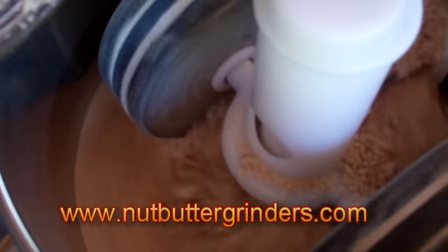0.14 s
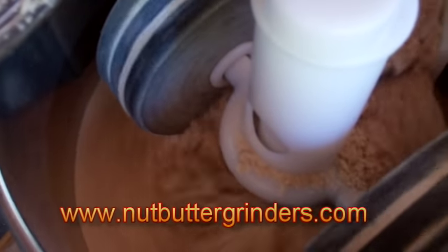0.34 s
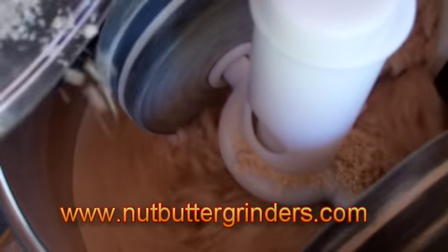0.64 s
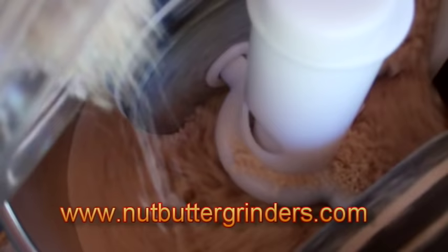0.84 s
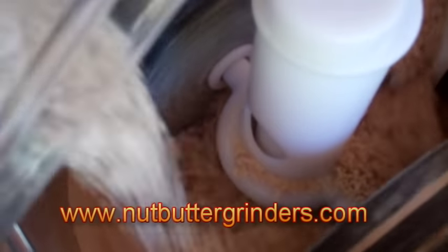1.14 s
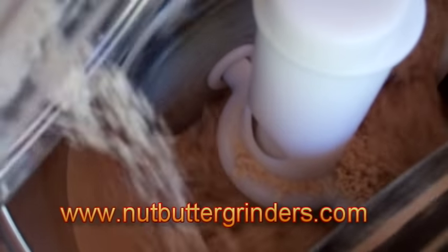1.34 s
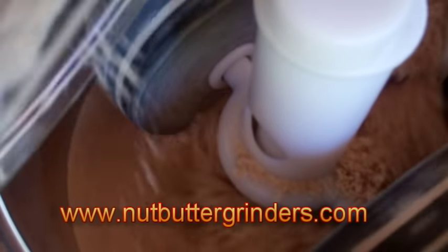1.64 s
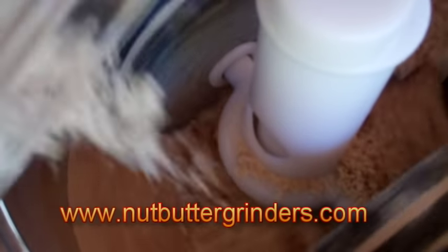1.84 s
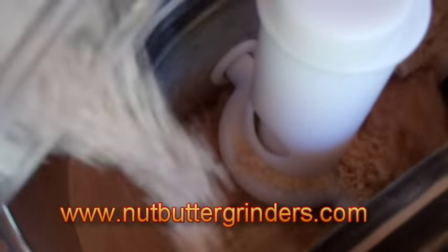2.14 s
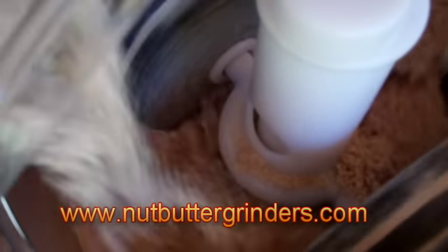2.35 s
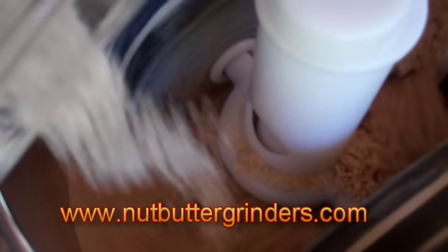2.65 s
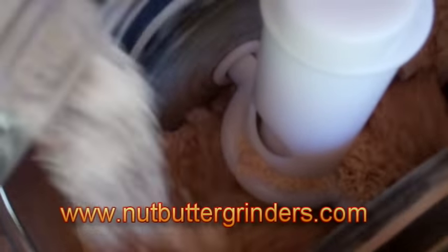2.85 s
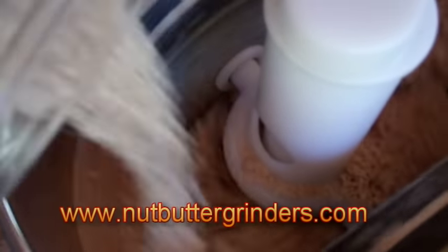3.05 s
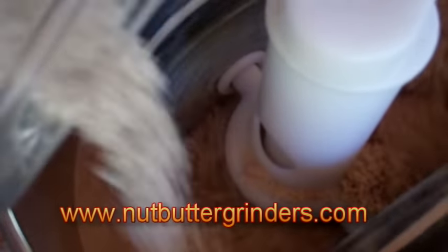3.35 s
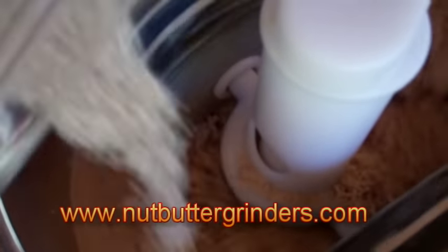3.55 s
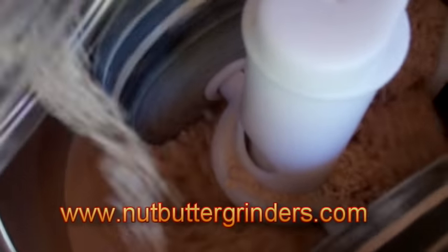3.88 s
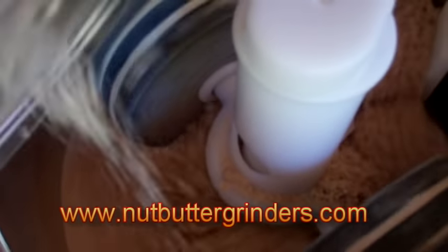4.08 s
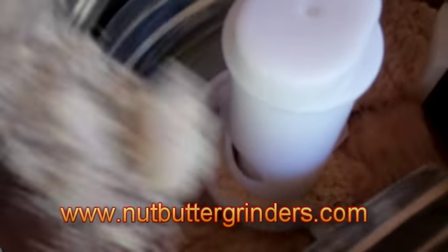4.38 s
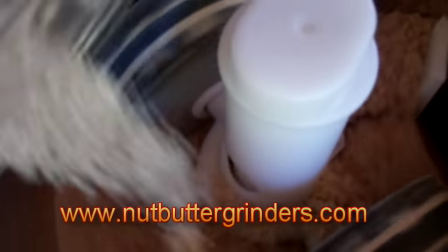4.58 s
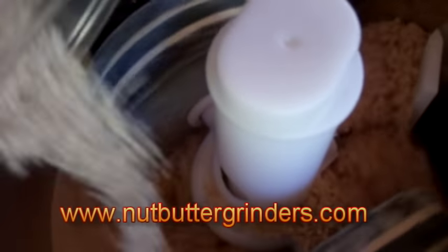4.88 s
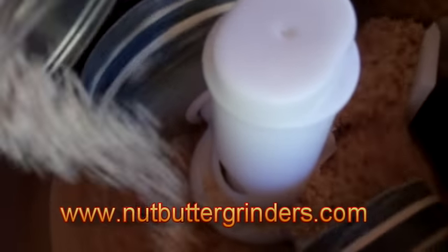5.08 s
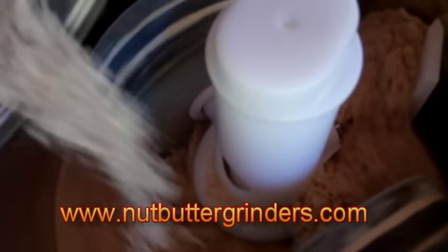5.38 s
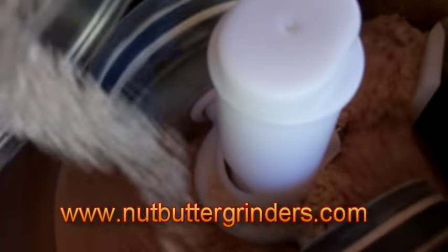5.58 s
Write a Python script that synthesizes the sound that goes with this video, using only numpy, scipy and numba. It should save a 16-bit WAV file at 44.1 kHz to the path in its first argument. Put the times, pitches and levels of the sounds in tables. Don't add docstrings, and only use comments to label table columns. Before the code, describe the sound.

A small electric stone grinder hums and rumbles steadily up close, seeds crackling and pinging, with a soft knock every half second.

```python
import sys
import numpy as np
from scipy import signal
from scipy.io import wavfile
from scipy.ndimage import uniform_filter1d
from numba import njit

SR = 44100
rng = np.random.default_rng(int(sys.argv[2]) if len(sys.argv) > 2 else 0)


def wav_out(sig):
    wavfile.write(sys.argv[1], SR, np.round(np.clip(np.atleast_2d(sig).T, -1, 1) * 32767).astype(np.int16))


def makeup_ratio(level_db):
    decades = np.asarray(level_db, float) / 20
    return 10 ** decades


N = 252235
T = np.arange(N) / SR
NOMINAL_HZ = 114
# [t/s, level/dB, wall ring above that/dB]
KNOCKS = [(.1108, -32, -4), (.562, -24.5, -16), (1.0137, -27, -10), (1.465, -32, -1), (1.916, -28, -11),
          (2.368, -30.5, -7), (2.821, -29, -11), (3.2795, -32, -5), (3.7408, -38, 0), (4.2051, -31, -10),
          (4.6655, -40, 2), (5.1347, -37.5, -2), (5.6028, -37, -4)]


@njit
def svf(x, hz, width_hz):
    y, band, low = np.empty(len(x)), 0., 0.
    g, k = np.tan(np.pi * hz / SR), width_hz / hz
    scale = 1 / (1 + g * (g + k))
    for i in range(len(x)):
        v = (band + g * (x[i] - low)) * scale
        band, low, y[i] = 2 * v - band, low + 2 * g * v, k * v
    return y


@njit
def follower(x, attack, release):
    y, level = np.empty(len(x)), 0.
    for i in range(len(x)):
        level += (x[i] - level) * (attack if x[i] > level else release)
        y[i] = level
    return y


def unit(x):
    return x / np.sqrt(np.mean(x ** 2))


def walk(rate_hz):
    knots = rng.standard_normal(N // 256)
    path = np.interp(T * rate_hz, np.arange(len(knots)), knots)
    return unit(uniform_filter1d(path, int(SR / rate_hz / 2)))


def columns(table):
    s, *rest = np.transpose(table)
    return [uniform_filter1d(np.interp(T, s, c), 2048) for c in rest]


def log_interp(hz, curve):
    f, value = np.transpose(curve)
    return np.interp(np.log(hz), np.log(f), value)


def bump(x, centre, width):
    return np.exp(-.5 * ((x - centre) / width) ** 2)


def pair(hz, width_hz, push=1):
    # [f/Hz, correlation]
    likeness = [(30, 0.7), (60, 0.98), (300, 1), (640, 0.97), (1400, 0.85), (3000, 0.57), (7000, 0.29),
                (14000, 0.13)]
    alike = np.clip(log_interp(hz, likeness), 0, .999)
    f, w = 1. * hz, 1.36 * width_hz
    noise = push * (rng.random((2, N)) - .5)
    mid, side = [unit(svf(svf(x, f, w), f, w)) for x in noise]
    mid = mid * np.sqrt((1 + alike) / 2)
    side = side * np.sqrt((1 - alike) / 2)
    return np.array([mid + side, mid - side])


def partial(phase, db, jitter, flutter_db, rate_hz, pan_db):
    level = np.sqrt(2) * makeup_ratio(db + flutter_db * walk(rate_hz))
    tone = level * np.sin(phase + jitter * walk(rate_hz))
    return tone * makeup_ratio(np.array([[pan_db], [-pan_db]]) / 2)


def controls():
    # [t/s, mean tooth rate/Hz, muffling by the paste/dB]
    speed = [(0, 114.3, 0.5), (1.5, 113.9, -1), (2.7, 113.7, -2), (3.3, 111.9, -3), (4.4, 112, -6.5),
             (5, 111.2, -9), (5.72, 111.5, -9)]
    # [t/s, tooth rate gained/Hz]
    lurches = [(.27, 1.8), (.76, 2), (1.26, 2.8), (1.69, 2.4), (2.2, 2.6), (2.62, 2.4), (3.09, 1.8),
               (3.56, 1.47), (4.12, 1.3), (4.7, 1.17), (5.26, 2), (5.64, 1.06)]
    # [level/dB, slope on mean rate/(dB/Hz), slope on lurch/(dB/Hz), share of muffling]
    voices = [
        (-36.5, -0.37, 1.17, 0),
        (-22, -0.42, -1, 0.0062),
        (-35.5, 0, 1.24, 0.8),
        (-43.5, 0, 1.65, 1.08),
    ]
    mean_hz, muffle_db = columns(speed)
    lurch_hz = sum(gain * bump(T, s, .075) for s, gain in lurches)
    sag_hz = mean_hz - NOMINAL_HZ
    levels = [db + a * sag_hz + b * lurch_hz + c * muffle_db for db, a, b, c in voices]
    return mean_hz + lurch_hz, muffle_db, levels


def effort(muffle_db):
    s = np.array(KNOCKS)[:, 0]
    turn_s = np.r_[2 * s[0] - s[1], s, 2 * s[-1] - s[-2]]
    turn = np.interp(T, turn_s, np.arange(len(s) + 2)) % 1
    cycle_db = -2.2 * bump(turn, 0.21, .09) + .7 * np.sin(np.pi * turn) ** 2
    middle, treble = 0.24, 0.09
    middle_db = cycle_db + middle * muffle_db + 0.33 * walk(6)
    return middle_db, (treble - middle) * muffle_db + .5 * walk(5.89)


def bearing(tooth_hz):
    phase = 2 * np.pi * np.cumsum(3343 + 9 * walk(5.4)) / SR
    lurch_hz = tooth_hz - uniform_filter1d(tooth_hz, size=20000)
    db = -57.5 + 1.2 * lurch_hz + 1.0 * walk(5)
    return partial(phase, db, jitter=1.2, flutter_db=2.5, rate_hz=40, pan_db=5.0)


def motor(tooth_hz, db):
    # [f/Hz, level/dB]
    mains = [(120, -53.5), (240, -43)]
    whine_hz = 1234.4 + 4.5 * (tooth_hz - NOMINAL_HZ)
    whine_phase = 2 * np.pi * np.cumsum(whine_hz) / SR
    out = partial(whine_phase, db - .3, jitter=0.57, flutter_db=2.0, rate_hz=20, pan_db=1.5)
    for f, buzz_db in mains:
        out += partial(2 * np.pi * f * T, buzz_db, jitter=0.054, flutter_db=3.0, rate_hz=4.0, pan_db=-0.5)
    return out


def housing(tooth_hz):
    # [f/Hz, width/Hz, level/dB, slope on tooth rate/(dB/Hz)]
    case_rings = [(112, 12, -55, 2.5), (131.4, 12, -46.5, 0.2), (145.3, 9.9, -45, 1.5),
                  (157.3, 11, -46.5, 0), (229, 24, -52, -1.5), (340, 36, -40.5, 3), (370.8, 38.7, -32, 1.2),
                  (470, 37, -42.5, 1.2), (407.5, 22, -45.5, -0.5), (575, 58, -48, 2), (671, 48, -52, -1.5),
                  (794.7, 42, -47, -1.5), (918, 51, -50, 0.5), (1098, 51, -47.5, 0.5), (1275, 59, -54, .5),
                  (1018, 70, -57.5, 1), (517, 46, -50, -1.5)]
    sag_hz = uniform_filter1d(tooth_hz, 4096) - NOMINAL_HZ
    return sum(makeup_ratio(db + slope * sag_hz + 1.5 * walk(12)) * pair(f, width) for f, width, db, slope in case_rings)


def grit(rate_hz, spread_db, t60_s, share):
    cracks = rng.random(N) < rate_hz / SR
    size = np.minimum(rng.exponential(size=N), 2.5)
    decay = 1000 ** (-1 / (t60_s * SR))
    bursts = signal.lfilter([1], [1, -decay], cracks * makeup_ratio(spread_db * size))
    return 1 + share * unit(bursts)


def rollers(middle_db, treble_db):
    # [f/Hz, density/(dB per Hz)]
    grind = [(25, -77), (50, -84), (90, -67), (190, -78), (280, -59.5), (430, -67.5), (600, -69.5),
             (1000, -73), (1250, -81.5), (1450, -89), (2200, -74), (4000, -80.5), (7000, -79.5),
             (14000, -80.5)]
    # [f/Hz, width/Hz, level/dB]
    drum_rings = [(1723, 420, -50.5), (2230, 240, -71), (2500, 42, -66), (2800, 58, -58.5),
                  (3346, 60, -59.5), (3290, 67, -57), (6860, 65, -78), (7820, 820, -49.5),
                  (13700, 3900, -49.5)]
    push = grit(rate_hz=140, spread_db=4.2, t60_s=.014, share=.42)
    surge_db = .45 * walk(30.05)
    treble_db = middle_db + treble_db
    middle_db = surge_db + middle_db - middle_db.mean()
    treble_db = surge_db + treble_db - treble_db.mean()
    out = 0
    for hz in 25 * 2 ** np.arange(0, 9.3, .4):
        db = log_interp(hz, grind) + 10 * np.log10(hz / 6.16)
        effort_db = 0.69 * middle_db if hz < 1400 else middle_db if hz < 3600 else treble_db
        level = makeup_ratio(db + effort_db + 0.73 * walk(16))
        out = out + level * pair(hz, hz / 2.72, 1 if hz < 1400 else push)
    for hz, width, db in drum_rings:
        own = push
        if width < hz / 8:
            own = grit(rate_hz=70, spread_db=5.5, t60_s=0.013, share=0.74)
        effort_db = middle_db if hz < 3600 else treble_db
        out = out + makeup_ratio(db + effort_db + 1.0 * walk(25.25)) * pair(hz, width, own)
    out = out - 0.16 * np.array([svf(ear, 1450., 240.) for ear in out])
    return out * makeup_ratio(np.array([[-.3], [.3]]))


def blows():
    # [t/s, level/dB, left minus right/dB]
    pings = [(0.079, -35, -4), (.223, -38, -4), (0.282, -38, -4), (.3024, -32, 0), (.4948, -36, 4),
             (1.1054, -37, -.5), (1.2717, -35, -4), (1.4054, -34, -9), (2.1924, -32, 7), (2.6347, -40.5, 2),
             (3.451, -34, -5), (3.8692, -35, -3), (4.0911, -37, -.5), (4.3058, -35, -4), (4.559, -33, -1),
             (4.752, -38, -2), (4.9369, -23, -.5), (4.99, -32, 1), (5.033, -38, -3), (5.3004, -35, -1),
             (5.6216, -33, 3)]
    # [t/s, level/dB, left minus right/dB]
    splits = [(.0578, -33, -2), (.7547, -36, -3), (1.7292, -36, -2), (2.1154, -40, 11), (4.508, -19, 0),
              (4.5174, -24, 5)]
    # [t/s, level/dB, left minus right/dB]
    taps = [(.014, -40, 0), (.082, -41, 0), (.1704, -36, -1), (0.3687, -37, -2), (.397, -41, 0),
            (.4374, -39, 0), (.482, -42, 6), (.9404, -41, -1), (1.06, -42, 0), (1.5291, -41.5, 0),
            (1.862, -43, -.5), (2.723, -38, -1), (2.7594, -44, 1)]
    # [snap/dB, stone ring/dB, crack/dB, drum wall/dB]
    shares = [
        (-2, -9, 0, 1),
        (-6, 2, -6, -19),
        (-24, -12, 1.5, -34),
        (2, -6, -2, 1),
    ]
    rows = []
    for s, db, wall_db in KNOCKS:
        rows.append((s, *(db + np.array(shares[0]) + [0, 0, 0, wall_db]), -2.5))
    for table, share in zip((pings, splits, taps), shares[1:]):
        rows += [(s, *(db + np.array(share)), pan_db) for s, db, pan_db in table]
    return rows


def ticks():
    # [level column, f/Hz, width/Hz, tail t60/s, share of tail, gain/dB]
    struck = [
        (0, 4850, 5000, .02, .1, 20),
        (1, 7950, 1050, .022, .1, 30),
        (2, 12000, 4500, .014, .09, 22.5),
        (3, 2500, 190, 0.055, .1, 36.5),
        (3, 2500, 1800, .028, .1, 25),
    ]
    t, out, rows = T[:2048], np.zeros((2, N + 4096)), blows()
    all_grains = rng.standard_normal((len(rows), 2, 2048))
    for (s, *levels, pan_db), grains in zip(rows, all_grains):
        for column, hz, width, t60_s, tail, db in struck:
            blow = (t == 0) + tail * grains * 1000 ** (-t / t60_s)
            for ear, sign in enumerate((1, -1)):
                i = int((s + .0008) * SR) + 1 - ear
                level = makeup_ratio(levels[int(column)] + db + sign * pan_db / 2)
                out[ear, i:i + 2048] += level * svf(blow[ear], 1. * hz, 1. * width)
    return out[:, :N]


def drive(hz, first_db, third_db, fourth_db):
    phase = 2 * np.pi * np.cumsum(hz * (1 + 0.0019 * walk(11))) / SR
    shaft = np.sin(phase * 0.24)
    first_phase = phase + 0.088 * shaft + 0.31 * np.sin(phase * 0.084)
    second_db = -38.7 + 1.7 * (hz - NOMINAL_HZ)
    third_phase = 3 * phase + 0.094 * shaft
    out = partial(first_phase, first_db - .4, jitter=.15, flutter_db=1.0, rate_hz=10, pan_db=0.3)
    out += partial(2 * phase, second_db, jitter=0.17, flutter_db=1.0, rate_hz=16, pan_db=-0.5)
    out += partial(third_phase, third_db - .3, jitter=.34, flutter_db=.9, rate_hz=25, pan_db=0.36)
    out += partial(4 * phase + np.pi, fourth_db - .6, jitter=0.76, flutter_db=2.0, rate_hz=25, pan_db=-4.0)
    return out


def scene():
    hz, muffle_db, (*levels, whine_db) = controls()
    knocks = ticks()
    whole = motor(hz, whine_db) + bearing(hz) + housing(hz) + rollers(*effort(muffle_db))
    whole = whole + knocks + drive(hz, *levels)
    low_pass = signal.ellip(12, .5, 75, 14200, fs=SR, output="sos")
    left, right = signal.sosfilt(low_pass, whole) + makeup_ratio(-39) * knocks
    return np.array([np.roll(left, 2), right])


def top_cut(x):
    return signal.sosfilt(signal.butter(12, 15550, fs=SR, output="sos"), x)


def record(dry):
    peak = follower(np.abs(dry).max(axis=0), attack=.3, release=.00022)
    gain = np.minimum(1, 0.22 / (peak + 1e-9)) ** 1.47
    gain = uniform_filter1d(gain, size=160)
    return top_cut(dry * np.roll(gain, 140))


dry = scene()
out = record(dry)
wav_out(out)
```